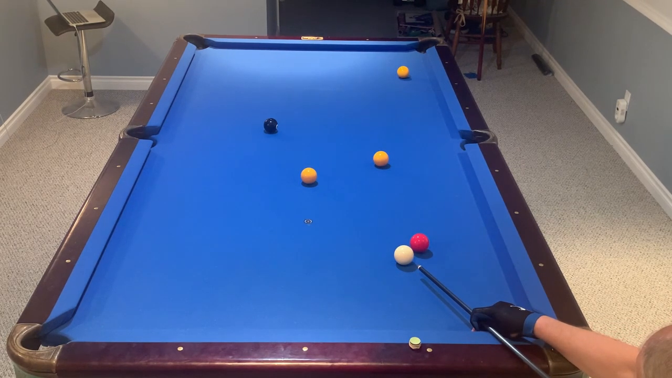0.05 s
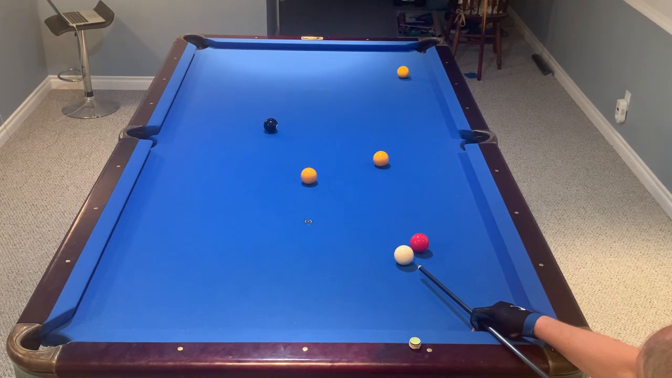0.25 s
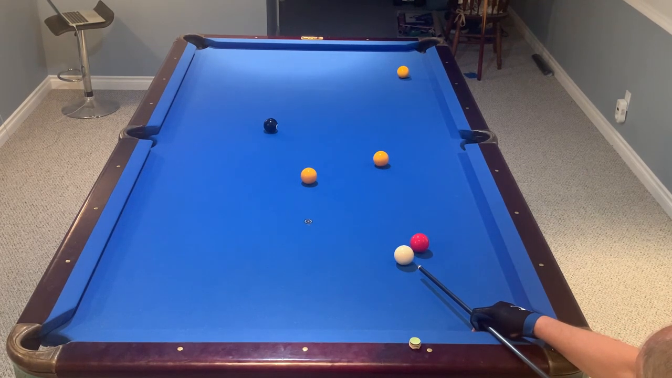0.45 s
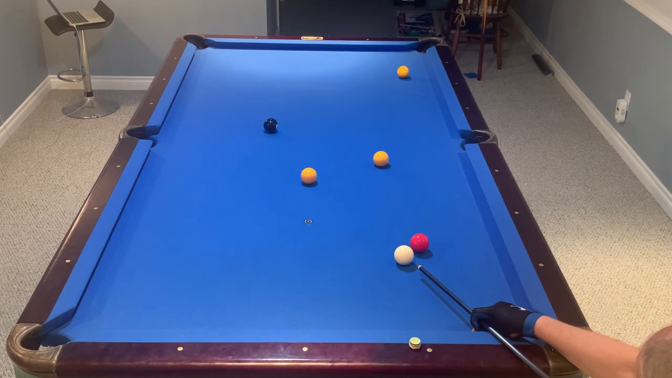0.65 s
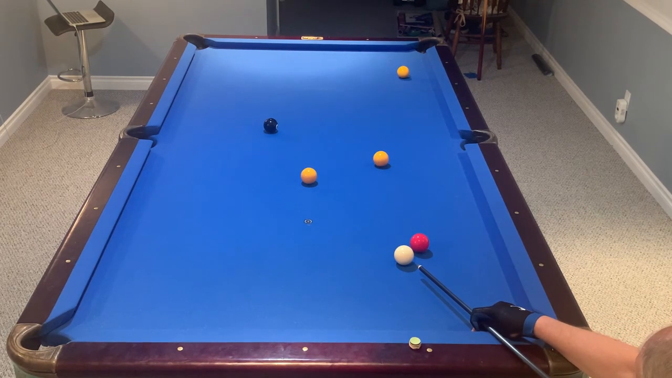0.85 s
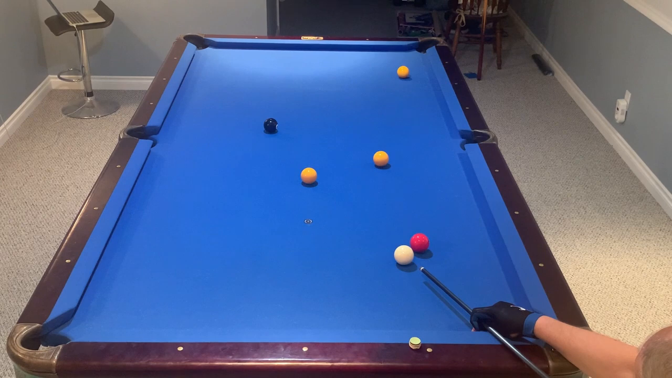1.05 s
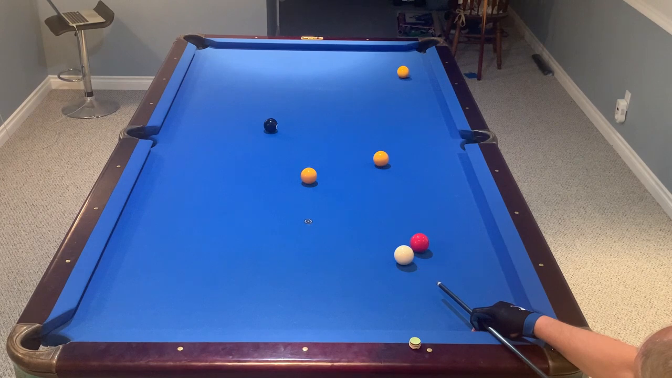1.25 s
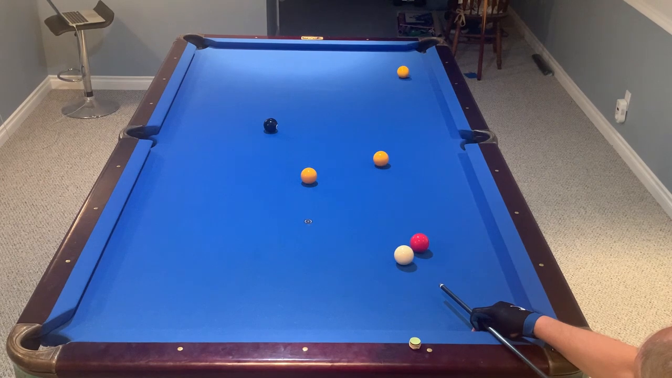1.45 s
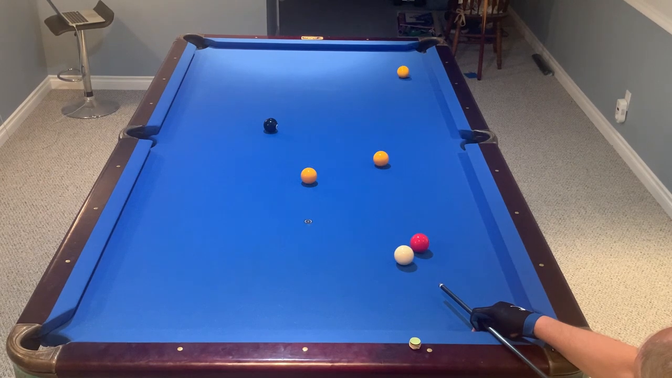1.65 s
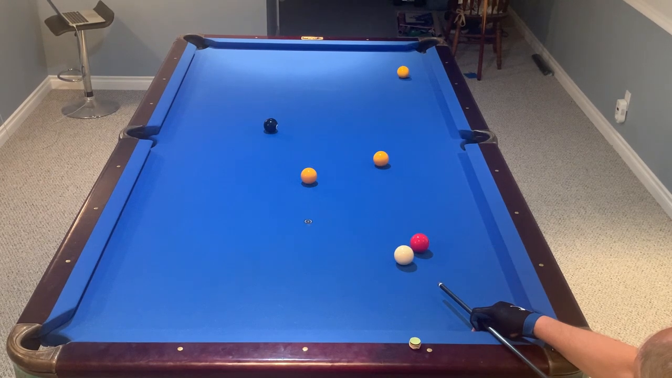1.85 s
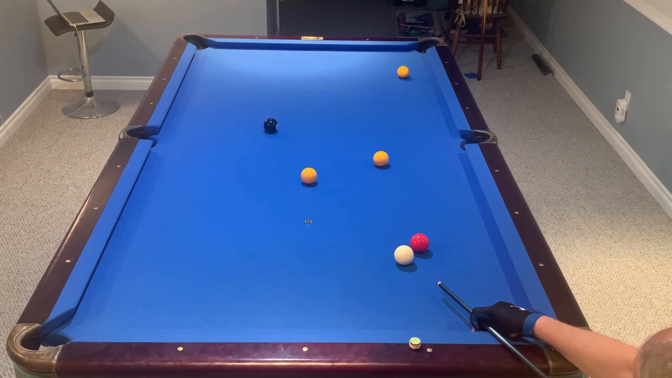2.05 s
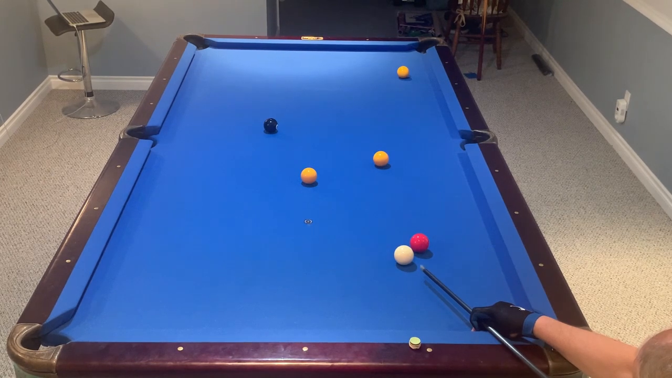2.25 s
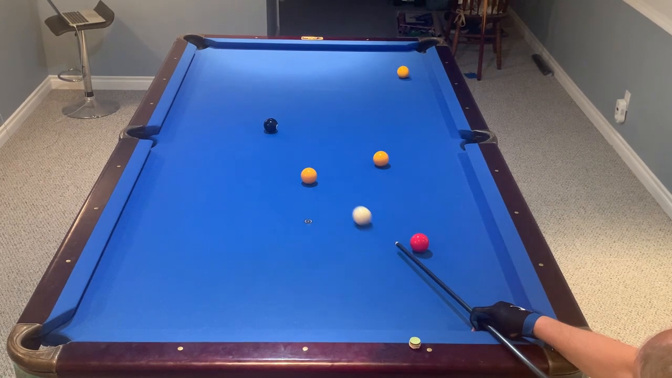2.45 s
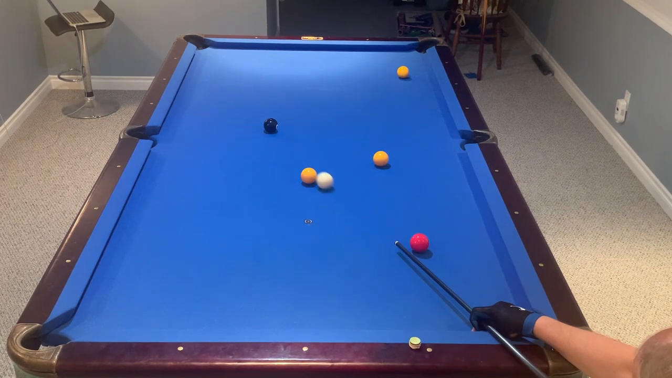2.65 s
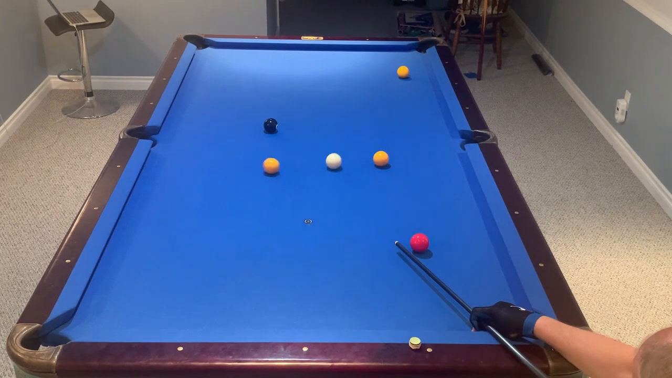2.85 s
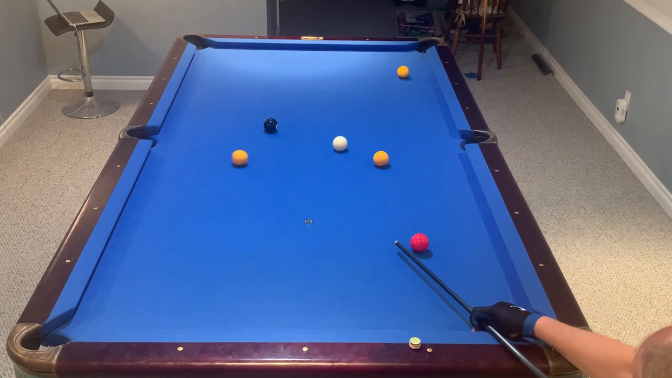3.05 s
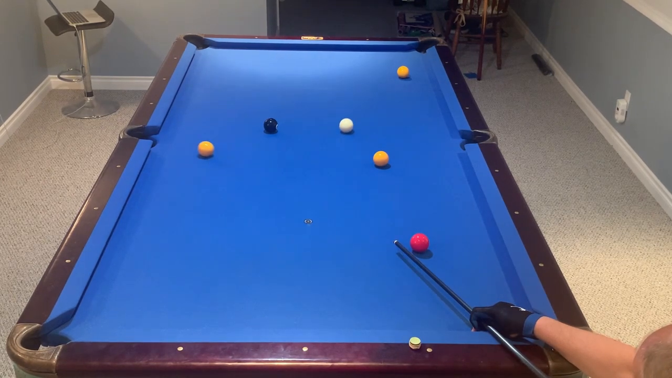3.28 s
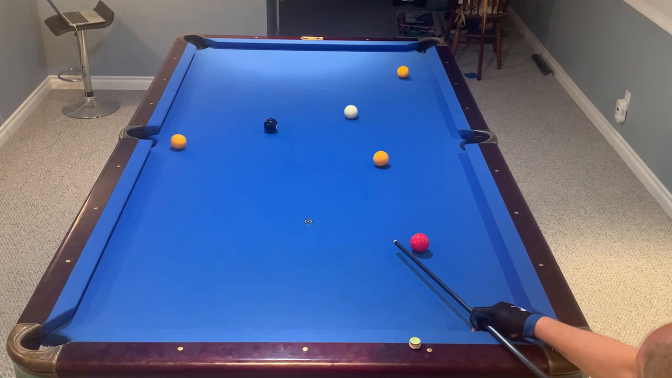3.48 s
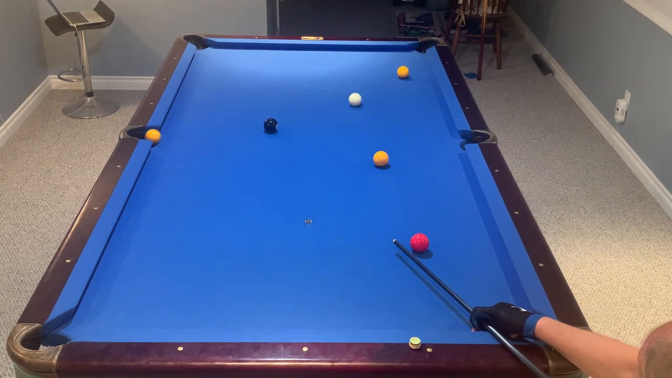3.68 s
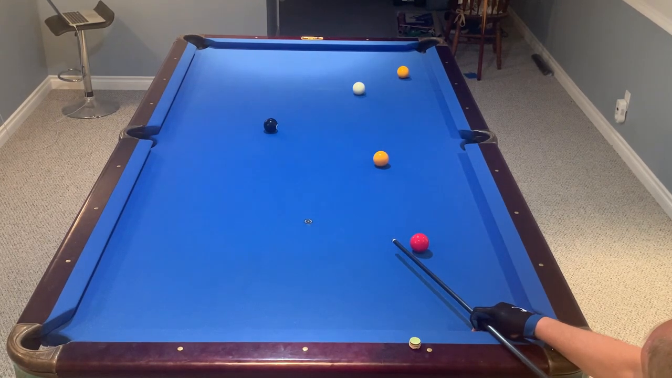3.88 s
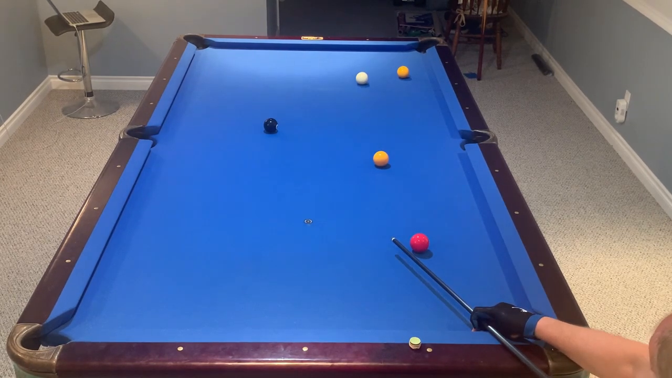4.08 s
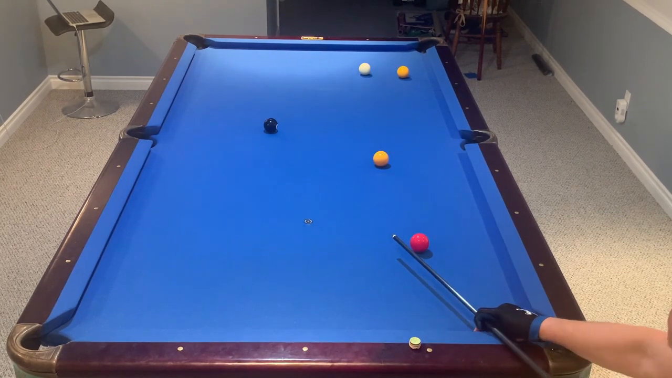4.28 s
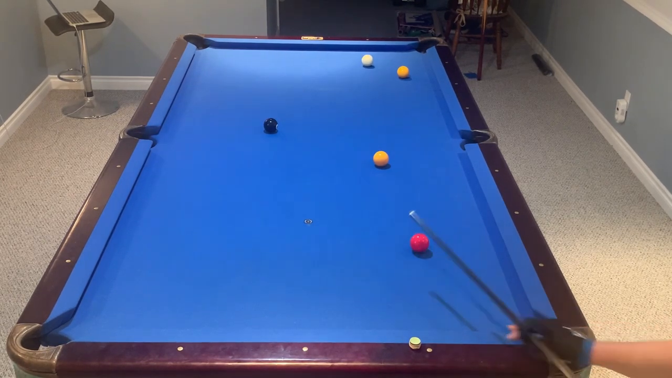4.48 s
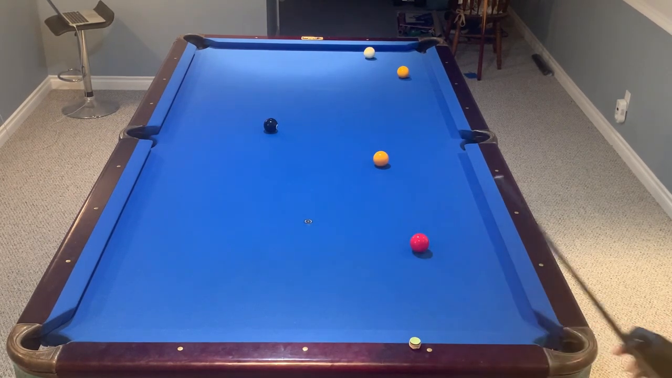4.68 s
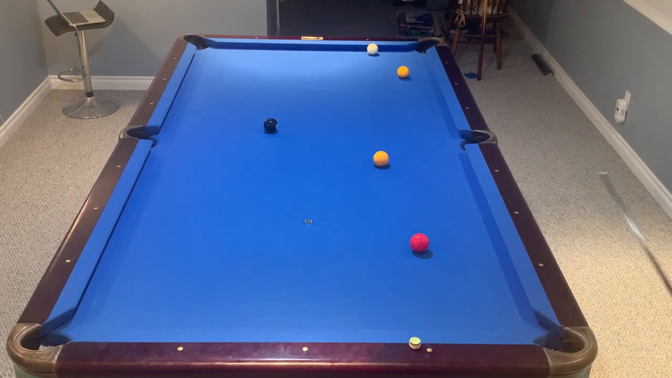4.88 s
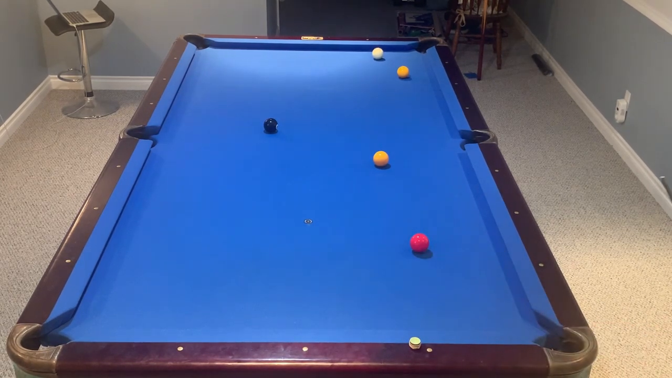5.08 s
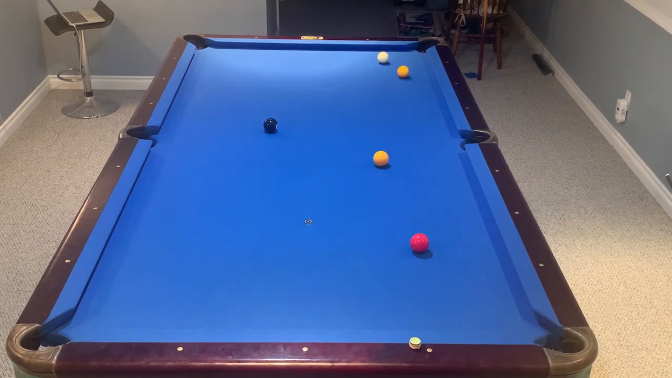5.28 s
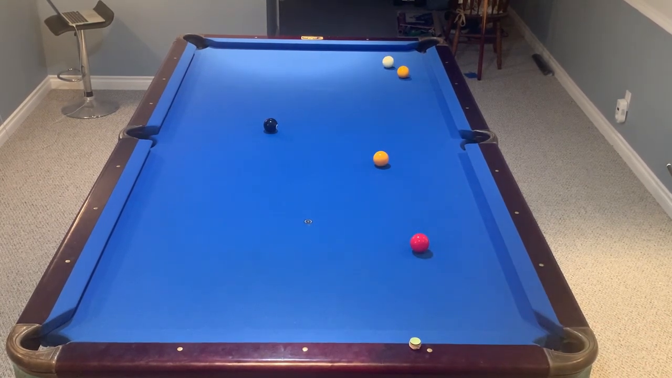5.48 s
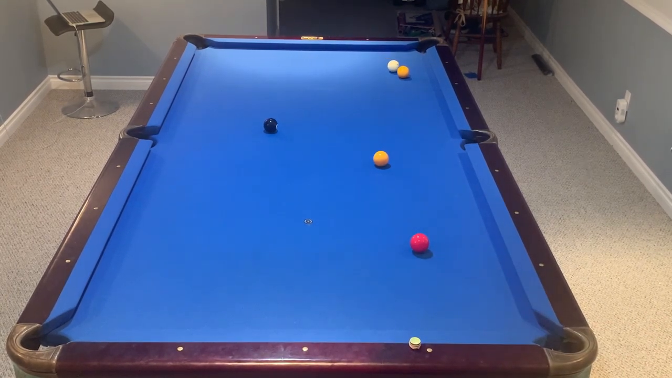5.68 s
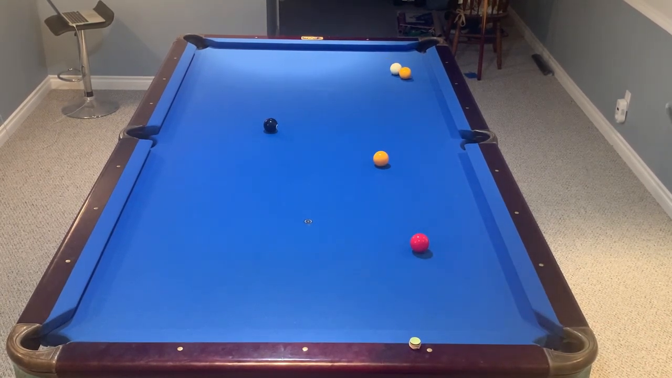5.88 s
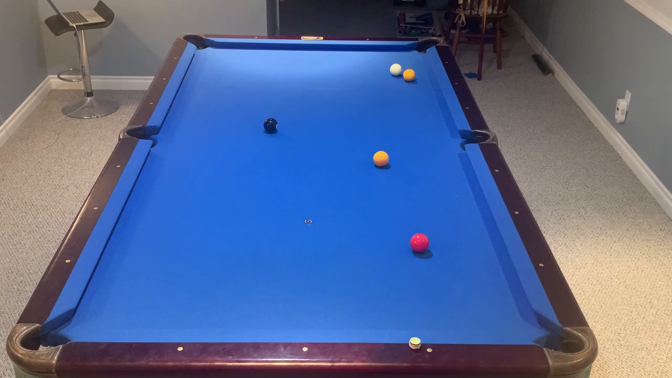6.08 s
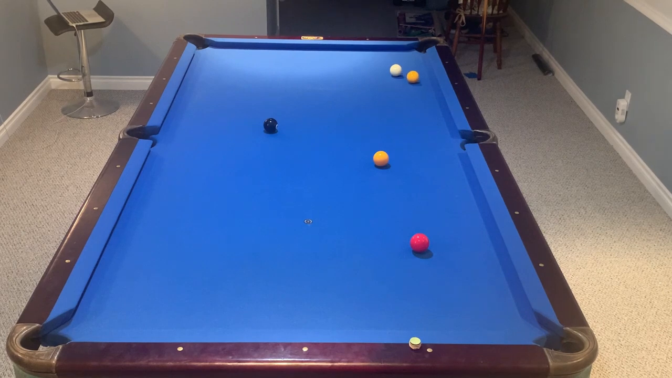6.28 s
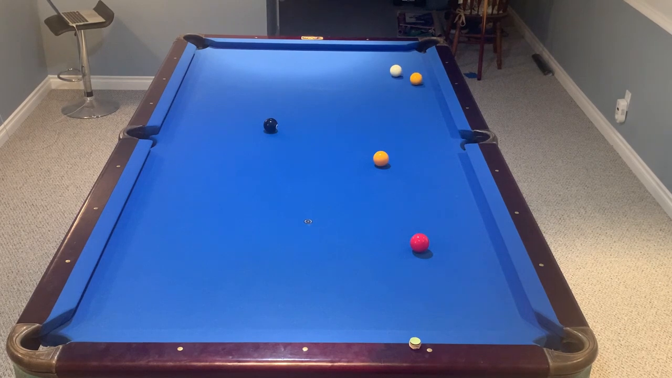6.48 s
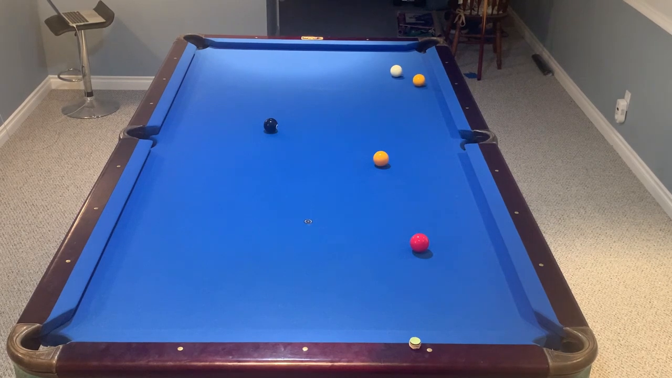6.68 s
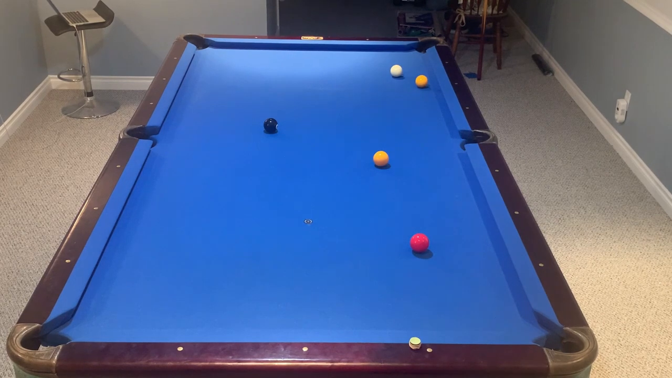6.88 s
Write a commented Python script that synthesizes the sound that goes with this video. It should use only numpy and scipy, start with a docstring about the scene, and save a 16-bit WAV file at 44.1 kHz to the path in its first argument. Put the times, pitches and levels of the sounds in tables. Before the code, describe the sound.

A quiet carpeted room with a pool table, heard in stereo from a little distance, with low, soft background hiss and a faint wavering hum. Nothing else happens until 2.3 s, when a cue strikes a ball: a woody, slightly ringing knock with tiny trailing contacts. At 2.7 s two hard balls collide in a bright, dry clack, the loudest sound, with short room echoes. Deep, uneven rolling over slate continues underneath. From 3.8 to 4.1 s a ball drops into a pocket in a quick cluster of hollow knocks and rattles, settling with a soft rumble and brushes around 4.2 s. The cue lightly taps the rail at 4.4 s. At 4.85 s a ball thuds dully on the cushion, with low rolling. Very faint ticks and a brush follow, then a soft ball-to-ball touch at 5.8 s. Rolling fades by 6 s; near-silence remains, with a barely audible brush at 6.6 s.

```python
"""Shaped background noise and a faint hum fill a quiet carpeted room with a pool table, heard in stereo.
A cue strikes a ball, balls clack and roll over the slate, and knocks rattle in a pocket. A soft rumble and
brushes follow, the cue taps the rail, a ball thuds on a cushion, then come faint ticks and a soft ball touch.
Blows are short coloured pulses with ringing tones and a treble tick, sent through echoes and a room tail.
Rolling and soft noises are filtered noise, the hum is wavering tones; a noise suppressor cleans the sum."""
import sys
import numpy as np
from scipy import signal
from scipy.fft import rfft, irfft, next_fast_len
from scipy.io import wavfile
from scipy.ndimage import uniform_filter1d

SR = 44100
rng = np.random.default_rng(int(sys.argv[2]) if len(sys.argv) > 2 else 0)


def persist_wave(psi):
    """Save psi, clipped to +-1, as 16-bit WAV."""
    counts = np.round(np.clip(psi, -1, 1) * 32767).astype(np.int16)
    wavfile.write(sys.argv[1], SR, np.atleast_2d(counts).T)


N = 305752  # length in samples
LEFT_RIGHT = np.array([[1], [-1]])  # adds a side signal to the left and takes it from the right


def undb(db):
    """Turn decibels into a plain gain."""
    return 10 ** (np.asarray(db) / 20)


def unit(x):
    """Scale a sound to an average (rms) level of 1."""
    return x / np.sqrt(np.mean(x ** 2))


def gain(tone, size):
    """Draw a smooth gain curve through (pitch_hz, level_db) points, one value per frequency bin."""
    hz, db = np.transpose(tone)
    bin_hz = np.arange(size // 2 + 1) * SR / size
    return undb(np.interp(np.log(bin_hz + 1), np.log(hz), db))


def coloured(tone):
    """Make noise of rms 1 whose spectrum follows the given points."""
    spectrum = rfft(rng.standard_normal(N))
    return unit(irfft(spectrum * gain(tone, N), N))


def high_pass(x, hz):
    """Keep only the treble above hz, with a steep filter."""
    return signal.sosfilt(signal.butter(4, hz, "high", fs=SR, output="sos"), x)


def resonate(x, modes):
    """Let a sound excite several resonances, each (pitch_hz, width_hz, level_db), and add them up."""
    total = 0
    for hz, width, db in modes:
        total = total + undb(db) * signal.lfilter(*signal.iirpeak(hz, hz / width, SR), x)
    return total


def walk(rate):
    """Wander without units: random values, `rate` per second, joined by glides, mostly within -1 to 1."""
    step = int(SR / rate)
    held = np.repeat(rng.standard_normal(N // step + 1), step)
    return 0.45 * uniform_filter1d(held, step)[:N]


# Colour of the background, same in both ears and opposite in the ears: pitch_hz, level_db (per Hz, relative)
HUSH = [(15, -41), (30, -16), (45, -5.5), (65, 3), (130, -7), (176, -5), (328, -7), (355, -6), (441, -11),
        (479, -8.5), (563, -16.5), (611, -20), (6450, -32), (8460, -37.5), (10200, -25.5), (16200, -39.5)]
HUSH_SIDE = [(15, -38.5), (25, -15.5), (65, 1.5), (302, -14), (355, -12), (645, -16), (823, -11),
             (1760, -19), (6810, -26.5), (9170, -17), (11100, -33), (13000, -13), (16200, -57.5)]
HUSH_DB, HUSH_SIDE_DB = -61.5, -66.5  # rms, before the treble wavers
# Hum tones: pitch_hz (before a wandering phase), level_db (rms, before wavering)
HUM = [(361, -72.5), (123.6, -76), (168.4, -80.5), (1081.5, -85.5), (706, -83)]
WAVER_HZ, WAVER_DB = 9090, 11.5  # treble above this wavers in level by at most this much up or down


def hush():
    """Shaped background noise whose treble wavers quickly in level, and a hum wavering in level and phase."""
    air = undb(HUSH_DB) * coloured(HUSH) + undb(HUSH_SIDE_DB) * coloured(HUSH_SIDE) * LEFT_RIGHT
    waver = undb(WAVER_DB * np.tanh(walk(38)))
    t = np.arange(N) / SR
    hum = 0
    for hz, db in HUM:
        level = np.sqrt(2) * undb(db + 7.0 * walk(28))
        hum = hum + level * np.sin(2 * np.pi * hz * t + 1.39 * walk(8))
    return air + high_pass(air, WAVER_HZ) * (waver - 1) + hum


# Soft noises: a low rumble near 580 Hz at 4.204 s as the ball settles in the pocket, a long, very faint
# broad hiss around 3.3 kHz at 4.45 s, and soft brushes in the other rows:
# start_s, length_s, level_db (before swell and catches), centre_hz, sharpness (Q of each of two filter passes)
SOFT_NOISES = [(4.204, 0.43, -61, 576, 4.3), (4.264, 0.125, -65.5, 2600, 0.35),
               (4.295, 0.056, -69.5, 4750, 6.2), (4.45, 1.7, -84.5, 3300, .45),
               (5.22, .11, -63.5, 580, 1.55), (6.596, 0.29, -70, 5975, 0.3)]


def soft_noises():
    """A soft rumble, a faint hiss and brushes: each is a band of noise that swells, catches and fades."""
    out = np.zeros((2, N))
    for start_s, length_s, db, hz, sharp in SOFT_NOISES:
        i, n = int(start_s * SR), int(length_s * SR)
        band = [(hz, hz / sharp, 0)]
        noise = rng.standard_normal((2, n))
        catches = undb(7 * walk(150)[:n])
        uneven = unit(resonate(resonate(noise, band), band)) * catches
        swell = np.abs(np.sin(np.pi * np.linspace(0, 1, n)) ** .7)
        out[:, i:i + n] += (undb(db) * uneven * swell)[:, :N - i]
    return out


def drone(mode):
    """One slate mode: narrow noise with its random swells evened out."""
    x = unit(resonate(resonate(rng.standard_normal(N), [mode]), [mode]))
    loudness = np.abs(signal.hilbert(x, next_fast_len(N))[:N])
    return unit(x / (.15 + uniform_filter1d(loudness, size=900)))


# Drumming of the slate under moving balls:
# time_s, deep_db (level of the low modes), upper_db (upper rumble, relative to the low modes)
ROLL = [(2.27, -92.5, 28.5), (2.329, -53, 11), (2.49, -42.5, -14), (2.68, -52, 4), (2.74, -43.5, -8.5),
        (3.16, -60, -4), (3.239, -53, -9), (3.43, -63.5, -10), (3.53, -50, -15.5), (3.56, -63.5, 7),
        (3.66, -47.5, -14.5), (3.82, -53.5, -3.5), (3.97, -44.5, -14.5), (4.04, -51.5, -0.5),
        (4.819, -56, -22.5), (4.86, -51, 0), (4.95, -49.5, -8.5), (4.981, -61.5, -1.5), (5.07, -61, -20.5),
        (5.8, -66.5, -3), (5.87, -53, -10.5), (5.915, -50, -11.5), (6.06, -91, 3.5)]
# Low modes of the slate: pitch_hz, width_hz (of each of two filter passes), level_db (before swaying)
SLATE = [(62.9, 11, -3.5), (77, 18, -3)]
# Upper rumble: pitch_hz, width_hz, level_db (width and level are for each of two filter passes)
RUMBLE = [(143.4, 88, 0.5), (186.7, 40, 0), (220, 130, -10)]
SLATE_SWAY_DB, SLATE_SWAY_PER_S = 2, 9  # scale and pace of the random sway
SLATE_SIDE_DB = -15  # part of the second mode that is opposite in the two ears


def rolling():
    """Rolling balls keep two slate modes sounding, now one, now the other; the upper rumble spreads wider."""
    s, deep_db, upper_db = np.transpose(ROLL)
    t = np.arange(N) / SR
    deep_level = undb(np.interp(t, s, deep_db, -120, -120))
    upper_level = undb(np.interp(t, s, upper_db))
    sway_db = SLATE_SWAY_DB * walk(SLATE_SWAY_PER_S)
    first, second = SLATE
    deep = undb(first[2] + sway_db) * drone(first) + undb(second[2] - sway_db) * drone(second)
    deep = deep + undb(SLATE_SIDE_DB) * drone(second) * LEFT_RIGHT
    mid, side = (unit(resonate(resonate(rng.standard_normal(N), RUMBLE), RUMBLE)) for _ in range(2))
    upper = mid + 0.4 * side * LEFT_RIGHT
    return deep_level * (deep + upper_level * upper)


BRIGHT_FROM_HZ = 895  # brightness grows over the octave above this, then stays


def blow(tone, modes, size=8192):
    """A knock: the shortest causal pulse with the given spectrum, then the dying ring of the body."""
    # folding the cepstrum packs the energy as early as possible
    cep = irfft(np.log(gain(tone, size)), size)
    cep[1:size // 2] *= 2
    cep[size // 2 + 1:] = 0
    pulse = irfft(np.exp(rfft(cep)), size)
    pulse = pulse * np.sqrt(SR / 100 / np.sum(pulse ** 2))  # energy of 10 ms at rms 1
    t = np.arange(size) / SR
    ring = sum(undb(db - 60 * t / t60) * np.sin(2 * np.pi * hz * t) for hz, db, t60 in modes)
    return pulse + 2 * ring


# Dying tail of the room: pitch_hz, t60_s (time to fall 60 dB), likeness (left to right, -1 to 1)
ROOM = [(70, 0.28, 0.8), (140, 0.82, 1), (280, 0.52, 0.5), (649.3, 0.46, -0.16), (1104.8, 0.33, -0.97),
        (1500, 0.25, -0.53), (1950, 0.32, 0.4), (2553, 0.29, 0.3), (3193, 0.29, 0.087), (5030, 0.25, -0.46),
        (9130, 0.44, 0.62), (13975, 0.096, -0.303)]
TAIL_DB, TAIL_RISE_S = -23, 0.004  # level before each blow's own trim; time constant of the build-up
PATCHY_DB, PATCH_S = 1, 0.013  # the tail comes in uneven patches


def room_tail(tail_db, size):
    """Sound bouncing all around the room: patchy noise that builds up fast and dies band by band."""
    t = np.arange(size) / SR
    octave = np.log2(np.arange(size // 2 + 1) * SR / size + 1)
    mid, side = rfft(rng.standard_normal((2, size)))
    patches = rng.standard_normal((len(ROOM), 256))
    centres, out = np.log2(np.array(ROOM)[:, 0]), np.zeros((2, size))
    for k, (hz, t60, like) in enumerate(ROOM):
        like = np.clip(like, -1, 1)
        share = np.interp(octave, centres, np.arange(len(ROOM)) == k)
        pair = np.sqrt((1 + like) / 2) * mid + np.sqrt((1 - like) / 2) * side * LEFT_RIGHT
        patch_db = PATCHY_DB * np.interp(t / PATCH_S, np.arange(patches.shape[1]), patches[k])
        out += irfft(pair * share, size) * undb(patch_db - 60 * t / t60)
    return out * undb(TAIL_DB + tail_db) * (1 - np.exp(-t / TAIL_RISE_S))


# Hard echoes from ceiling and walls, before each blow's own spacing factor and echo trim:
# delay_ms, left_db, right_db, left_later_ms (this lag is not stretched by the spacing)
ECHOES = [(5.992, -0.5, -3, 0.4), (7.535, -6, -4.5, .5), (9.01, -2.5, -8.5, 0.34), (16.45, -5, -7.5, -0.56),
          (19.77, -8, -6, -.3), (25.9, -7.5, -5, 0.71), (30.46, -7, -9, -.4), (38, -9.5, -11.5, .3)]
SCATTER_DB, SCATTER_T60_S = -12, 0.0087  # rough surfaces smear every echo


def hard_echoes(spacing, echo_db, size):
    """Ceiling and walls answer with single copies, each smeared by a short burst of noise."""
    short, early = np.arange(512) / SR, np.zeros((2, size))
    for ms, left_db, right_db, lag_ms in ECHOES:
        echo = rng.standard_normal(len(short)) * undb(SCATTER_DB - 60 * short / SCATTER_T60_S)
        echo[0] = 1
        for ear, (db, side_ms) in enumerate(((left_db, lag_ms / 2), (right_db, -lag_ms / 2))):
            i = int((ms * spacing + side_ms) * SR / 1000)
            early[ear, i:i + len(short)] += undb(db + echo_db) * echo
    return early


ECHO_HZ = 5125  # soft furnishings dull every reflection above this


def room(direct_db, spacing, echo_db, tail_db, thin_hz, direct_hz, size=32768):
    """Response from one spot: direct sound, echoes and tail; a small object sends little bass straight out."""
    def thin(x, hz):
        """Take away bass; the lows build up through table and room instead."""
        return signal.lfilter(*signal.butter(2, hz, "high", fs=SR), x)

    click = np.zeros(size)
    click[0] = 1
    reflected = room_tail(tail_db, size) + thin(hard_echoes(spacing, echo_db, size), thin_hz)
    dulled = signal.lfilter(*signal.butter(1, ECHO_HZ, fs=SR), reflected)
    return dulled + undb(direct_db) * thin(click, direct_hz)


TICK_HZ, TICK_T60_S = 9300, 0.023  # treble tick: lowest pitch, time to fall 60 dB

# All hit tables (CUE, CLACKS, TAPS, TICKS_AND_TOUCH) share these columns; levels are before the
# microphone colour: start_s, level_db (before the room), left_minus_right_db, direct_db,
# echo_spacing (factor), tick_db, left_later_ms, brightness_db
# All *_TONE tables: pitch_hz, level_db (per Hz, relative)
# All ring tables: pitch_hz, level_db (before doubling and the hit's own level), t60_s
# All *_SPACE settings: echo_db, tail_db, echo_thin_hz, direct_thin_hz (bass is thinned below these)


def hits(table, tone, modes, space, pitch_spread=0):
    """Each blow sounds through the room from its own spot; the first contact adds a treble tick."""
    out = np.zeros((2, N + SR))
    fade = undb(-60 * np.arange(4096) / SR / TICK_T60_S)
    for s, db, pan_db, direct_db, spacing, tick_db, lag_ms, treble_db in table:
        pitch = np.exp(pitch_spread * rng.standard_normal())

        def lift(hz):
            """Extra brightness at this pitch."""
            return treble_db * np.clip(np.log2(hz / BRIGHT_FROM_HZ), 0, 1)

        bright_tone = [(hz * pitch, d + lift(hz)) for hz, d in tone]
        bright_modes = [(hz * pitch, d + lift(hz), t60) for hz, d, t60 in modes]
        pulse = blow(bright_tone, bright_modes)
        heard = undb(db) * signal.fftconvolve(room(direct_db, spacing, *space), pulse[None], axes=1)
        tick = rng.standard_normal((2, len(fade))) * fade * undb(tick_db)
        heard[:, :len(fade)] += high_pass(tick, TICK_HZ)
        for ear, side in enumerate((1, -1)):
            i = int((s + side * lag_ms / 2000) * SR)
            out[ear, i:i + heard.shape[1]] += heard[ear] * undb(side * pan_db / 2)
    return out[:, :N]


def at_spot(knocks, spot):
    """Place knocks at one spot; the ball moves a little, so the echoes shift from knock to knock."""
    pan_db, direct_db, spacing, tick_db, lag_ms = spot
    shift = 1 + .06 * rng.standard_normal(len(knocks))
    return [(s, db, pan_db, direct_db, spacing * k, db + tick_db + treble_db, lag_ms, treble_db)
            for (s, db, treble_db), k in zip(knocks, shift)]


# Faint ticks of unknown source, then a soft ball touch (hit columns), their colour and the room's answer
TICKS_AND_TOUCH = [(5.125, -78, 0.1, -10.5, 0.96, -86, 0.1, 5.6), (5.258, -72, 0.097, -14, .9, -87, .3, 6),
                   (5.506, -73, 0.1, -14, 0.93, -85, .3, 6), (5.8209, -43, 0.1, 3.5, .72, -63, 0.1, 1.5)]
TOUCH_TONE = [(60, -31), (140, -15), (250, -15), (380, -13), (615, -1), (800, -9), (1120, -3), (1500, -4),
              (1900, 0), (2600, -8), (3100, -19.5), (3500, -31.5), (4600, -30), (8500, -71.5), (16000, -52)]
TOUCH_SPACE = (-1.5, -0.6, 748, 900)
# One short ring, shared with the clack: pitch_hz, level_db, t60_s
SHORT_RING = [(2080, -20.5, 0.03004), (2403, -22, 0.028), (2800, -23.5, 0.028)]


def ticks_and_touch():
    """Faint ticks of unknown source, then a soft ball touch: small pulses sharing one short ring."""
    return hits(TICKS_AND_TOUCH, TOUCH_TONE, SHORT_RING, TOUCH_SPACE)


# Ball on the far cushion: start_s, level_db (before room and microphones), brightness_db
THUDS = [(4.8545, -53.5, -3.5), (4.868, -55.5, -1), (4.8735, -56.5, 2.5), (4.8945, -58, .3)]
# Colour of the thud, then ringing of the rail, then the room's answer
THUD_TONE = [(60, -21.5), (120, -5), (200, -10), (330, 0), (480, 5.5), (620, -9), (800, -23.5),
             (2000, -83.5), (16000, -76)]
RAIL = [(142, -12.5, 0.077), (280, -18.5, 0.035), (370, -9, 0.06), (453, -2.5, 0.072), (633, -16.5, 0.064)]
RAIL_SPACE = (-3, -8.5, 107, 91)
# Its place: left_minus_right_db, direct_db, echo_spacing (factor), tick_db (next to the knock), left_later_ms
RAIL_SPOT = (3, 4.5, 0.97, -39, -0.87)


def cushion_thuds():
    """A ball thuds on the far cushion: dull pulses with the low ring of the rail."""
    return hits(at_spot(THUDS, RAIL_SPOT), THUD_TONE, RAIL, RAIL_SPACE)


# The lifted cue knocks the rail (hit columns), its colour, ringing and the room's answer
TAPS = [(4.4095, -55, 0.54, -3, 0.66, -72.5, 0.45, 0.07), (4.425, -62, 0.3, -2, 0.8, -80, 0.4, -.7)]
TAP_TONE = [(100, -26.5), (300, -4), (600, 3), (1200, -17.5), (2400, -7), (3200, -15), (4500, -10.5),
            (6000, -22), (16000, -48)]
TAP_RING = [(550, -15, 0.056), (2330, -28, 0.042), (4360, -29, .04)]
TAP_SPACE = (-1.5, 1.5, 400, 400.5)


def rail_taps():
    """The cue is lifted and knocks the rail: light pulses with a short ring."""
    return hits(TAPS, TAP_TONE, TAP_RING, TAP_SPACE)


# Place of the pocket: left_minus_right_db, direct_db, echo_spacing (factor),
# tick_db (next to the knock), left_later_ms
POCKET_SPOT = (0.9, -4, 1.02, -16, 1.25)
RATTLE_S, RATTLE_GAP_S = 3.925, .014  # start and average gap
RATTLE_DB, RATTLE_FADE_DB_PER_S, RATTLE_SCATTER_DB = -53, 34, 3  # starting level, fade, random spread
RATTLE_DIRECT_DB, RATTLE_TICK_DB = -8.5, -19.5  # direct sound; tick next to the knock


def rattle(count=13):
    """The ball settles: quick small knocks at uneven gaps that weaken on the whole."""
    chance = rng.standard_normal((count, 2))
    after = RATTLE_GAP_S * (np.arange(count) + 0.25 * chance[:, 0])
    db = RATTLE_DB - RATTLE_FADE_DB_PER_S * after + RATTLE_SCATTER_DB * chance[:, 1]
    pan_db, _, spacing, _, lag_ms = POCKET_SPOT
    knocks = list(zip(RATTLE_S + after, db, 0 * db))
    return at_spot(knocks, (pan_db, RATTLE_DIRECT_DB, spacing, RATTLE_TICK_DB, lag_ms))


# Ball dropping into the pocket: start_s, level_db (before room and microphones), brightness_db
POCKET = [(3.799, -54.5, -17), (3.815, -57, -21), (3.8485, -36.5, -.3), (3.864, -45, 4), (3.8975, -35, 2.2),
          (3.912, -38, 3.5), (3.932, -44.5, 5), (3.959, -45, 2), (3.972, -46, -0.5), (3.999, -45.5, 0.3),
          (4.016, -42.5, -4), (4.04, -47, -3), (4.065, -51, -2.5)]
# Colour of the knocks, then ringing of the pocket basket, then the room's answer
POCKET_TONE = [(70, -32), (240, -15), (490, 2.5), (800, -4), (1200, -3), (1650, -2), (2100, 1), (2550, -4),
               (3000, -14.5), (3500, -17), (4500, -27.5), (5500, -34.5), (7000, -40.5), (16000, -70.5)]
BASKET = [(477, -12.5, 0.083), (2024, -37.5, 0.049)]
POCKET_SPACE = (-4.5, -0.9, 280, 260.5)
POCKET_PITCH_SPREAD = 0.055  # about 5.5 %: every knock meets another part of the pocket


def pocket_drop():
    """A ball drops into the pocket: knocks of varying pitch ring the basket, with a small rattle."""
    knocks = at_spot(POCKET, POCKET_SPOT) + rattle()
    return hits(knocks, POCKET_TONE, BASKET, POCKET_SPACE, POCKET_PITCH_SPREAD)


# Hard clack of two balls (hit columns), its colour and the room's answer
CLACKS = [(2.6768, -27.5, 0.011, -1.5, 1.0, -34, 0.015, 0.1)]
CLACK_TONE = [(60, -15.5), (180, -9), (360, -11), (730, -9.5), (950, -10.5), (1300, -5), (1600, -1.5),
              (2050, 2), (2600, -4.5), (3400, -10), (4000, -23.5), (4500, -35.5), (5500, -33), (7000, -42),
              (16000, -57)]
CLACK_SPACE = (-1.5, .3, 1250, 2300)


def ball_clacks():
    """Two hard balls collide: a bright pulse and a very short ring."""
    return hits(CLACKS, CLACK_TONE, SHORT_RING, CLACK_SPACE)


# Cue strike as several close contacts (hit columns), its colour, ringing shaft and the room's answer
CUE = [(2.3066, -37.5, 3.5, 1.5, .75, -57, 0.4, 5), (2.3105, -41.5, -0.5, 4, 0.97, -64, -.35, 3.5),
       (2.3158, -41.5, -0.3, 3.5, 0.8, -71, .4, 2.5), (2.334, -45, 0.9, -1, .9, -78.5, 0.1, -5.5),
       (2.384, -53, 1.7, -4, 0.63, -85, 0.1, -4.5)]
CUE_TONE = [(60, -40.5), (140, -25), (220, -4), (380, -3.5), (570, -1), (800, -7.5), (1200, -20),
            (1600, -14), (2050, -12.5), (2600, -23), (3250, -29.5), (3560, -28.5), (4100, -32),
            (4700, -30.5), (7000, -38.5), (16000, -73.5)]
SHAFT = [(221, -16, .1), (303, -19, 0.17), (403, -16, 0.18), (460, -18.5, .15), (576, -11, 0.1),
         (720, -18, 0.08), (900, -23, .06), (1450, -21, 0.07), (1740, -19, 0.088), (2066, -16.5, 0.1),
         (2357, -24, 0.05), (2710, -21, 0.05), (2964, -24, 0.06), (3440, -23, 0.05), (4800, -31, 0.03)]
CUE_SPACE = (-1.3, -3.5, 228, 233)


def cue_strike():
    """The cue strikes a ball: a woody pulse, weaker contacts after it, and the ringing of the shaft."""
    return hits(CUE, CUE_TONE, SHAFT, CUE_SPACE)


# How blows reach the two microphones: pitch_hz, middle_db, sides_db
PORTS = [(28, -22, -22), (60, -0.15, -3), (150.1, 0.8, -3), (260, 0.65, 1.5), (400, 1.16, -1.27),
         (780, -0.4, 3.5), (1050, 1.5, 3.5), (1350, -5.5, 7), (1650, 0.77, 4.5), (2000, -0.4, -0.3),
         (3000, -0.16, 2), (5000, -0.66, -0.36), (12000, 1, 3)]


def spread(pair):
    """Two spaced microphones: some bands cancel in the middle and grow at the sides."""
    ports = np.array(PORTS)
    mid = rfft(pair[0] + pair[1]) * gain(ports[:, [0, 1]], N) / 2
    side = rfft(pair[0] - pair[1]) * gain(ports[:, [0, 2]], N) / 2
    return irfft(np.array([mid + side, mid - side]), N)


def scene():
    """Add up the background, the soft noises, the rolling and all blows."""
    blows = ticks_and_touch() + cushion_thuds() + rail_taps() + pocket_drop() + ball_clacks() + cue_strike()
    return hush() + soft_noises() + rolling() + spread(blows)


SUPPRESS_DB, THRESHOLD_DB = -7, 2.5  # most it turns down; margin added to the steady background
TOP_HZ = 16600  # nothing much is left above this


def record(dry):
    """A noise suppressor turns down what sinks near the steady background, so tails end early; the top is cut."""
    bins = signal.stft(dry, nperseg=512)[2]
    power = np.mean(np.abs(bins) ** 2, axis=0)
    power = uniform_filter1d(uniform_filter1d(power, size=7, axis=0), size=5, axis=1)
    steady = np.percentile(power, 25, axis=1, keepdims=True)  # the quieter moments of each band
    keep = np.maximum(1 - steady * undb(2 * THRESHOLD_DB) / power, undb(2 * SUPPRESS_DB))
    clean = signal.istft(bins * np.sqrt(keep), nperseg=512)[1][:, :N]
    return signal.sosfilt(signal.ellip(8, .2, 70, TOP_HZ, fs=SR, output="sos"), clean)


dry = scene()
out = record(dry)
persist_wave(out)
```